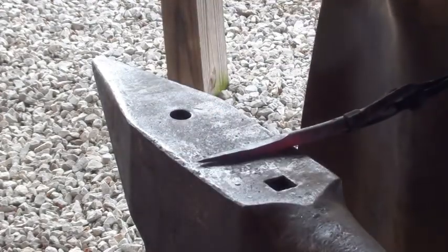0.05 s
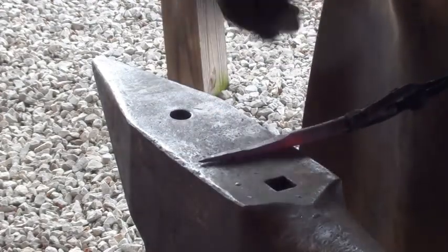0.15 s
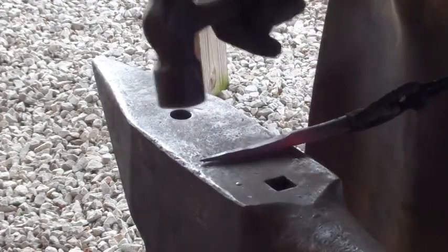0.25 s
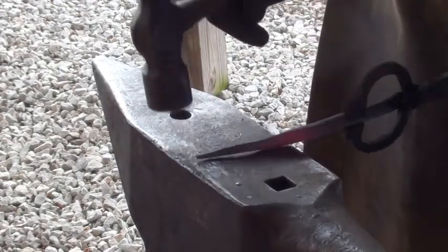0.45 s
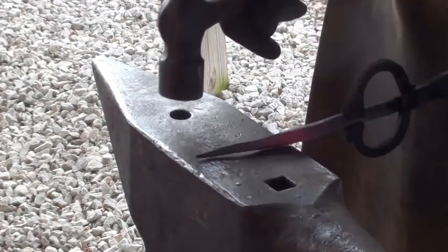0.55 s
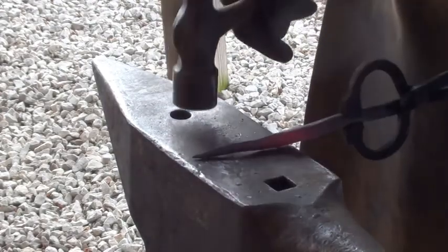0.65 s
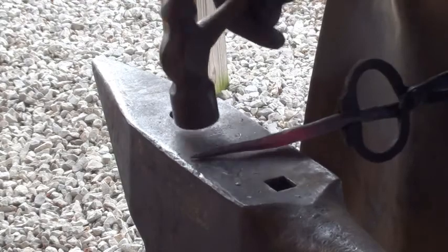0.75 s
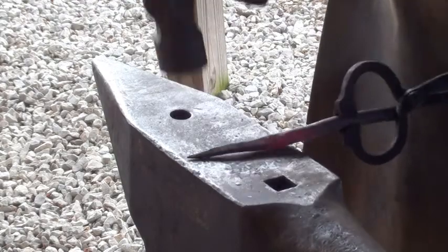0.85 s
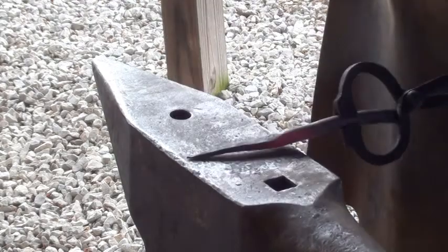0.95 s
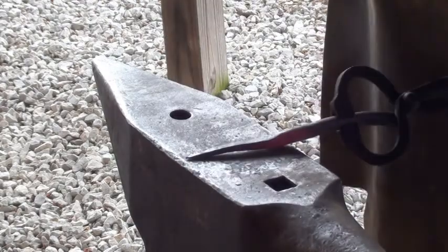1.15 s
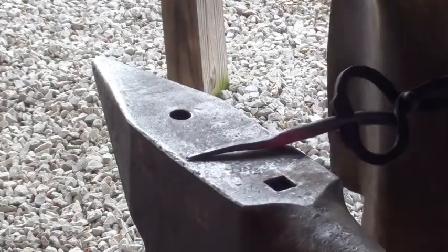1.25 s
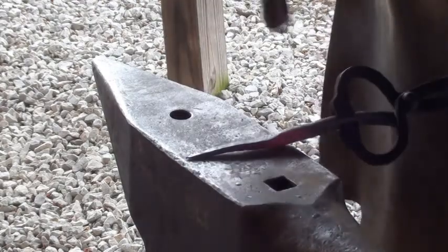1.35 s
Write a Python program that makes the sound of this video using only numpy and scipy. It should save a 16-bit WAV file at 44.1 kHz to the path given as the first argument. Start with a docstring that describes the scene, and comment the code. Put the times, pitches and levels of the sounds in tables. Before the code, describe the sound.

A hammer strikes hot iron on an anvil, four quickening blows with a bright ring.

```python
"""Open shed roof over a steel anvil: a smith hammers hot iron. A heavy blow, a lighter one, a bounce on
the bare face, a last dull blow, then a tick as the iron settles; an earlier blow still rings at the start.
Each blow cracks, thumps the stand, clanks the iron and sets hammer and anvil ringing. The shed throws it
back over faint outdoor air; a limiter ducks the hits, so the ring swells up behind them."""
import sys
import numpy as np
from scipy import signal
from scipy.fft import rfft, irfft
from scipy.io import wavfile
from scipy.ndimage import uniform_filter1d, minimum_filter1d

SR = 44100
rng = np.random.default_rng(int(sys.argv[2]) if len(sys.argv) > 2 else 0)


def waveform_to_disk(signal):
    """Save audio, clipped to [-1, 1], as 16-bit WAV at the path in sys.argv[1]."""
    frames = np.transpose(np.atleast_2d(signal))
    scaled = np.clip(frames, -1, 1) * 32767
    samples = np.round(scaled).astype(np.int16)
    wavfile.write(sys.argv[1], SR, samples)


N = 61739
LEAD = round(0.5 * SR)  # room for the blow before t = 0
TIME = np.arange(-LEAD, N) / SR

# hammer blows: t/s, force/dB, direct crack/dB, dullness/0-1, thump/dB, clank/dB, hammer ring/dB,
# hammer t60 factor, anvil ring/dB, ring tilt through iron/(dB/octave), share on bare face/0-1
BLOWS = [(-.33, 2, -19, .2, 6, 2, -2, .95, -1, 0, 0), (0.23, 4.5, 0, 0, 0.5, -11, 2.5, 0.48, 1, 0, 0.1),
         (0.5414, -5.5, -5, 0.1, -3.5, 5, 6, 0.9, -3, -3.5, 0.04),
         (0.6755, -9.5, -13.5, 0.19, -9, -2.5, 7.5, 0.91, 8.5, 0, 0.99),
         (0.7879, -15, 2, 0.35, 2, 7.5, 6.5, 0.31, 0, -17, 0.12)]
# stereo width: f/Hz, relative side level/dB
WIDTH = [(100, -17.5), (350, -11), (700, 1), (2000, 3), (5500, 7.5), (8000, 3), (15000, -25)]


def amp(db):
    """Decibels to gain."""
    return 10 ** (np.asarray(db) / 20)


def unit(x):
    """Scale to rms 1."""
    return x / np.sqrt(np.mean(x ** 2) + 1e-20)


def lookup(points, hz, column=1):
    """Table column interpolated over log frequency."""
    table = np.array(points, float)
    return np.interp(np.log(hz + 1), np.log(table[:, 0] + 1), table[:, column])


def add(mix, start_s, sound):
    """Mix a sound in at start_s."""
    part = mix[LEAD + round(start_s * SR):][:len(sound)]
    part += sound[:len(part)]


def colour(x, points, size=4096):
    """Minimum-phase filter of unit energy with the given spectral shape."""
    log_gain = np.log(amp(lookup(points, abs(np.fft.fftfreq(size, 1 / SR)))))
    taps = np.fft.ifft(np.exp(np.conj(signal.hilbert(log_gain)))).real[:size // 2]
    return signal.fftconvolve(x, taps / np.linalg.norm(taps))[:len(x)]


def decay(t, t60):
    """Fall of 60 dB per t60."""
    return np.exp(-np.minimum(np.log(1000) * t / t60, 40))


def ring(modes, t60_factor=1):
    """Damped modes struck at once."""
    t = np.arange(SR // 2) / SR
    return sum(amp(db) * decay(t, t60 * t60_factor) * np.sin(2 * np.pi * hz * t) for hz, t60, db in modes)


def burst(t60_s, size=2048):
    """Decaying noise, whitened, energy 1."""
    spectrum = rfft(rng.standard_normal(size) * decay(np.arange(size) / SR, t60_s))
    smoothed = np.sqrt(uniform_filter1d(abs(spectrum) ** 2, size=5) + 1e-9)
    x = irfft(spectrum / smoothed)[:size // 2]
    return x / np.linalg.norm(x)


def waver(band_hz=25.7):
    """Random drift, rms about 1."""
    knots_s = np.arange(TIME[0], TIME[-1] + 0.1, 1 / (2 * band_hz))
    return np.interp(TIME, knots_s, rng.standard_normal(1024)[:len(knots_s)])


def air():
    """Steady outdoor background, nearly mono."""
    # noise spectrum: f/Hz, relative density/dB
    spectrum = [(15, -74.5), (25, -35), (75, -4.5), (113, -6.5), (297, -10), (322, -13), (919, -16),
                (1380, -21.5), (3090, -25), (4870, -24.5), (15500, -32.5)]
    mid, side = (unit(colour(rng.standard_normal(len(TIME)), spectrum)) for _ in range(2))
    return amp(-53) * (mid + amp(-12) * np.outer([1, -1], colour(side, WIDTH)))


def contact_crack():
    """Noise burst per blow, low-passed by dull contact. Returns direct sound and shed feed."""
    # crack spectrum: f/Hz, relative density/dB
    spectrum = [(40, -46.5), (120, -16), (260, 3.5), (600, 0), (1200, 0.5), (2000, 2.5), (3500, 1),
                (6000, -2.5), (9800, -6), (12000, -16), (15500, -19)]
    direct, feed = np.zeros((2, len(TIME)))
    for start_s, force_db, crack_db, dull, *_ in BLOWS:
        softened = signal.lfilter([(1 - dull) ** 2], np.poly([dull, dull]), burst(t60_s=0.0091))
        crack = amp(force_db + 16.5) * softened
        add(feed, start_s, crack)
        add(direct, start_s, amp(crack_db + 5) * crack)
    return colour(direct, spectrum), colour(feed, spectrum)


def iron_clank():
    """The squeezed iron clanks briefly."""
    # iron modes: f/Hz, t60/s, level/dB
    modes = [(1950, .012, -26), (4226, 0.019, -2), (7820, 0.019, -33)]
    out = np.zeros(len(TIME))
    for start_s, force_db, _, _, _, clank_db, *_ in BLOWS:
        add(out, start_s, amp(force_db + clank_db) * ring(modes))
    return out


def hammer_ring():
    """Hammer head and work piece ring, for a different time at each blow."""
    # head and work piece modes: f/Hz, t60/s, level/dB
    modes = [(3032, 0.23, -18), (5160, 0.039, -15), (5330, 0.13, -20), (7355, 0.14, -7), (7425, 0.133, -20),
             (7930, 0.094, -23), (9700, 0.086, -34)]
    out = np.zeros(len(TIME))
    for start_s, force_db, _, _, _, _, hammer_db, t60_factor, *_ in BLOWS:
        add(out, start_s, amp(force_db + hammer_db) * ring(modes, t60_factor))
    return out


def stand_thump(delay_s=0.00208, highpass_hz=189):
    """Low modes of the anvil stand answer just after contact."""
    # stand modes: f/Hz, t60/s, level/dB
    modes = [(228.5, .04, -43), (320, 0.12, -22), (370, 0.087, -19), (548, 0.018, -19.5),
             (770, 0.037, -21.5)]
    out = np.zeros(len(TIME))
    for start_s, force_db, _, _, thump_db, *_ in BLOWS:
        add(out, start_s + delay_s, amp(force_db + thump_db) * ring(modes))
    return signal.sosfilt(signal.butter(4, highpass_hz, "high", fs=SR, output="sos"), out)


def anvil_ring(bloom_s=0.018, top_flutter_db=3.5):
    """Blows feed the long modes by where they land; the sound builds up and flutters under the roof."""
    # anvil modes: f/Hz
    modes_hz = [3145.5, 5081, 5828, 6288, 6380, 6729, 9475, 9637, 9857, 10177, 11283, 12350, 12591, 14500,
                14533, 15051, 15414]
    # same modes: t60/s, level struck through iron/dB, level struck on bare face/dB
    modes = [(0.61, -2, -23), (0.28, -9, -15.5), (0.23, -29, -17.5), (0.2, -23.5, -40.5),
             (.35, -25.5, -13.5), (0.37, -18, -17), (0.4, -27, -48.5), (0.68, -28.5, -35.5),
             (0.18, -14.5, -44), (0.28, -14, -28.5), (0.41, -25.5, -28.5), (0.46, -32, -45),
             (0.66, -21.5, -52), (0.43, -30, -61.5), (.5, -33, -59.5), (.7, -31.5, -55), (.5, -32, -45.5)]
    out, t = np.zeros((2, len(TIME))), TIME[::20]
    for k, (hz, (t60, iron_db, face_db)) in enumerate(zip(modes_hz, modes)):
        octaves = np.log2(hz / modes_hz[0])
        power = 0
        for start_s, force_db, *_, ring_db, tilt_db, bare in BLOWS:
            age_s = np.maximum(t - start_s, 0)
            drive = (1 - bare) * amp(iron_db + tilt_db * octaves) + bare * amp(face_db)
            envelope = (1 - np.exp(-age_s / bloom_s)) * decay(age_s, t60)
            power += (amp(force_db + ring_db) * drive * envelope) ** 2
        tone = np.interp(TIME, t, np.sqrt(power)) * np.sin(2 * np.pi * (hz * TIME + rng.random()))
        flutter = amp(top_flutter_db * waver() * np.sqrt(hz / max(modes_hz)))
        pan = 0.085 * amp(lookup(WIDTH, hz)) * waver()
        gains = np.array([1 + pan, 1 - pan]) if k else amp([[0.75], [-0.75]])  # lowest mode: just left
        out += tone * flutter * gains
    return out


def shed(x, rise_s=0.004):
    """Dense early echoes from roof and posts, then a longer tail."""
    # reverberation: f/Hz, early t60/s, late t60/s, late level/dB, relative band level/dB
    bands = [(150, 0.41, 0.81, 3, -8), (382, 0.13, 0.67, -19, 12), (1230, 0.25, 1, -17.5, 5.5),
             (3550, 0.27, 0.86, -17, -2.5), (8100, 0.19, 0.5, -20.5, 5.5), (15060, 0.15, .35, -27.5, 7)]
    # distinct reflections: delay/s, gain
    echoes = [(.0045, 0.34), (0.01, .35), (.0145, 0.27), (.021, .4), (0.031, 0.16)]
    hz, t, noise = signal.stft(rng.choice([-1., 1.], SR), SR, nperseg=256)
    early_s, late_s, late_db, band_db = (lookup(bands, hz, k)[:, None] for k in range(1, 5))
    envelope = amp(band_db) * np.hypot(decay(t, early_s), amp(late_db) * decay(t, late_s))
    response = signal.istft(noise * envelope, SR, nperseg=256)[1]
    response *= 1 - np.exp(-np.arange(len(response)) / SR / rise_s)
    response *= amp(2) / np.linalg.norm(response)
    for delay_s, gain in echoes:
        response[round(delay_s * SR)] += gain
    return signal.fftconvolve(x, response)[:len(x)]


def impacts():
    """Crack, clank, hammer ring and thump with the shed's answer, nearly mono."""
    crack, crack_feed = contact_crack()
    clank, hammer, thump = iron_clank(), hammer_ring(), stand_thump()
    feed = crack_feed + thump + amp(-13.5) * clank + amp(-0.5) * hammer
    side = amp(-16) * colour(shed(feed), WIDTH)
    return crack + thump + clank + hammer + shed(feed) + np.outer([1, -1], side)


def iron_tick():
    """The iron settles on the face with a light click."""
    # contacts: t/s, level/dB
    contacts = [(1.0144, -20)]
    # click spectrum: f/Hz, relative density/dB
    spectrum = [(100, -33.5), (3000, 9), (5500, 14.5), (8000, 16), (11000, 7), (15500, -12)]
    clicks = np.zeros(len(TIME))
    for start_s, db in contacts:
        add(clicks, start_s, amp(db) * burst(t60_s=0.0078))
    direct = colour(clicks, spectrum)
    return direct + amp(-4) * shed(direct)


def scene():
    """Stereo sum from t = 0."""
    return (impacts() + anvil_ring() + iron_tick() + air())[:, LEAD:]


def record(dry, limit_db=-11, release_s=(0.024, 0.31), lookahead_s=0.0012, ceiling=0.7, edge_hz=15900):
    """Look-ahead limiter with quick and slow recovery, soft ceiling, low-pass."""
    t, ahead = np.arange(N) / SR, round(lookahead_s * SR)
    power = abs(uniform_filter1d((dry ** 2).mean(0), size=96))
    over_db = np.maximum(10 * np.log10(power + 1e-12) - limit_db, 1e-9)
    # peak hold, exponential release
    quick_db, slow_db = (np.exp(np.maximum.accumulate(np.log(over_db) + t / s) - t / s)
                         for s in release_s)
    gain_db = minimum_filter1d(-0.86 * quick_db - 0.14 * slow_db, 2 * ahead)
    ducked = dry * amp(uniform_filter1d(gain_db, ahead))
    clipped = ducked / (1 + abs(ducked / ceiling) ** 6) ** (1 / 6)
    lowpass = signal.firwin(255, edge_hz, window=("kaiser", 9), fs=SR)
    return signal.oaconvolve(clipped, lowpass[None], "same", axes=1)


dry = scene()
out = record(dry)
waveform_to_disk(out)
```